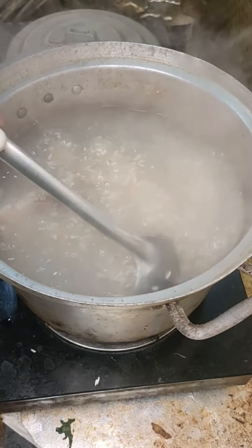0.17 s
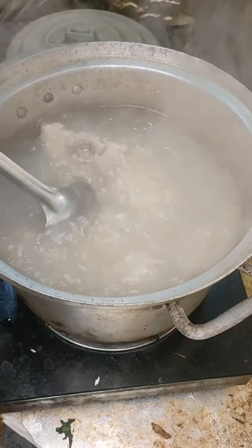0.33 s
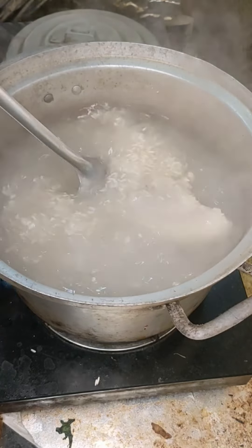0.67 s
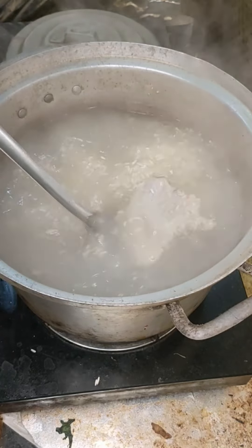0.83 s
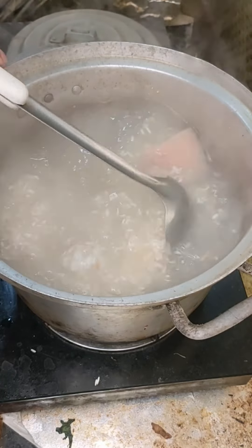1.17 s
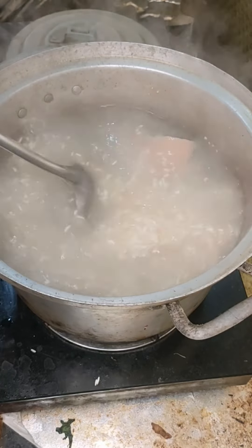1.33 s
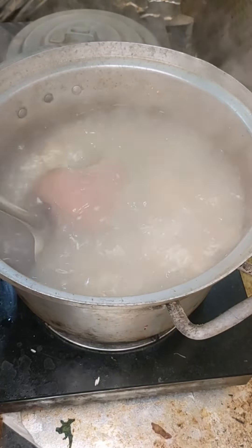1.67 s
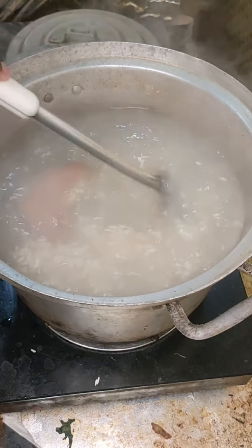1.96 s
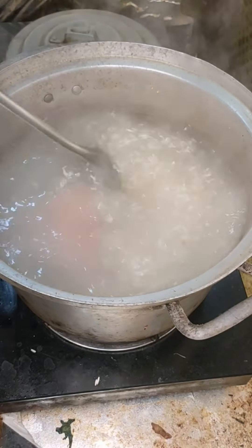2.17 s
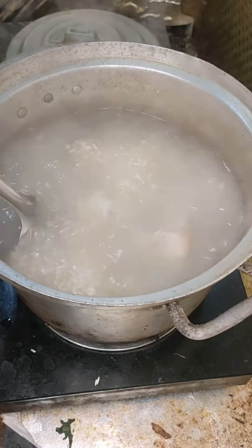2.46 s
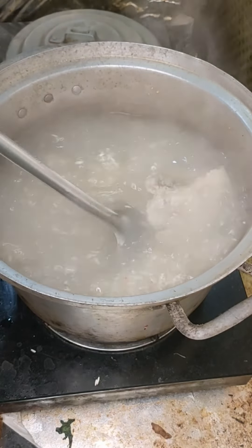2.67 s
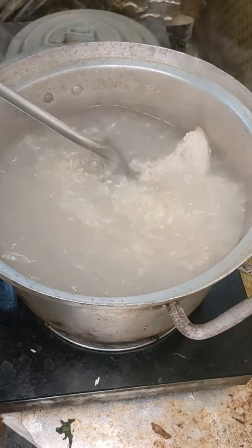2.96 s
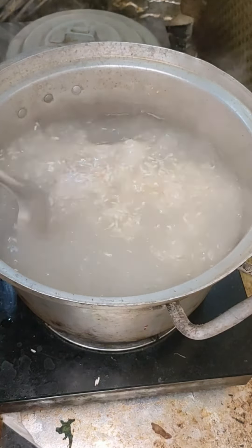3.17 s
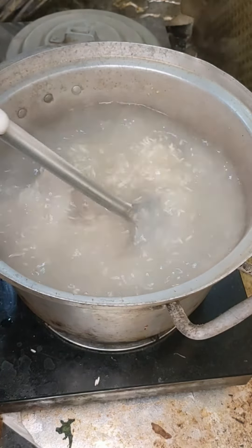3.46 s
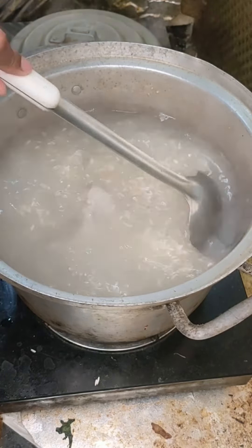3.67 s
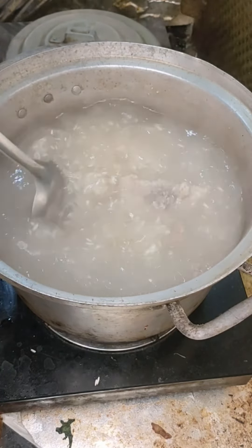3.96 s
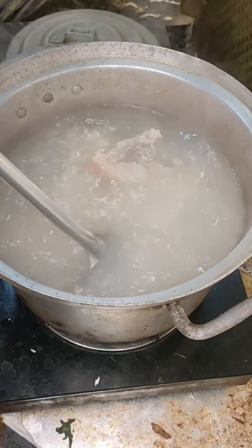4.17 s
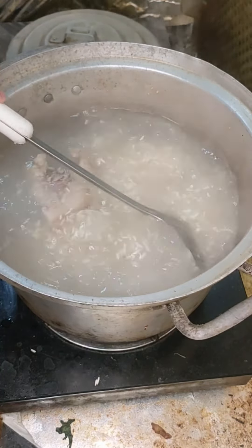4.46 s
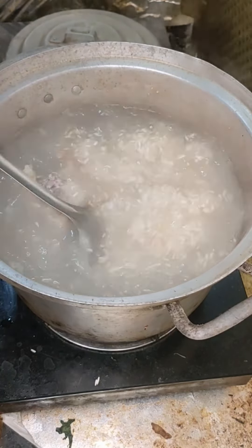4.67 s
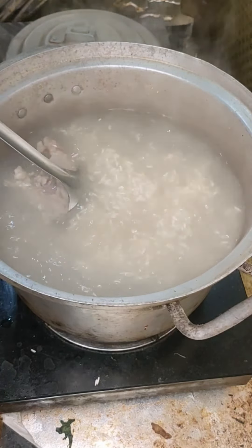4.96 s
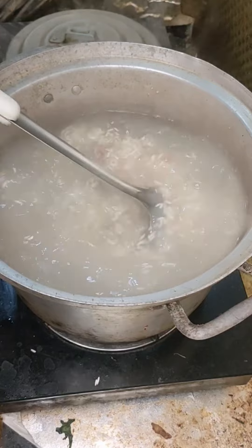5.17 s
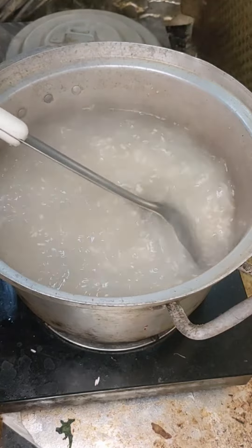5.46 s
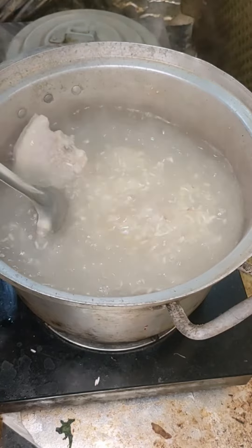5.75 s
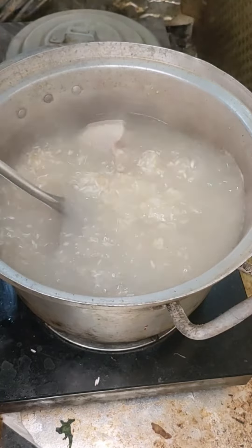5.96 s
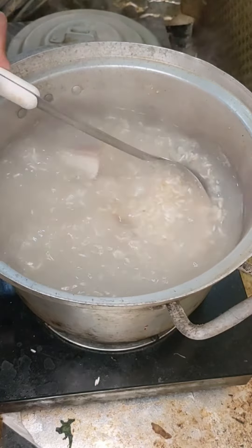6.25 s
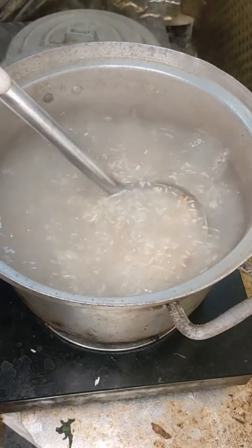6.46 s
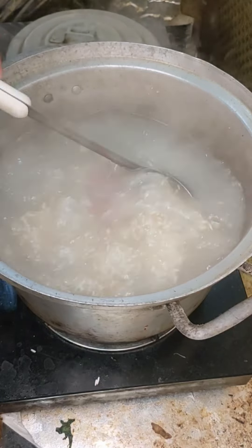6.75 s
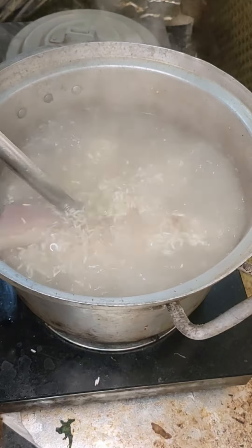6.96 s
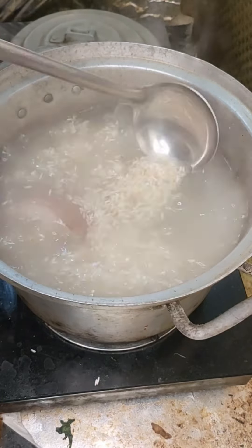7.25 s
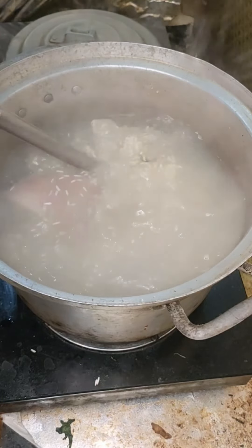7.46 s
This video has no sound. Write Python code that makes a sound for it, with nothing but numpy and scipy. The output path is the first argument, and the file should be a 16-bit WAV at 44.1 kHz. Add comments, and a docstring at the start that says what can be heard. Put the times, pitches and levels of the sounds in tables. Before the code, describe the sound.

A metal ladle scrapes and clacks in a big pot of simmering porridge over a roaring gas flame, while a cleaver chops on wood further off.

```python
"""A steel ladle stirs rice porridge in a big aluminium pot on a gas burner, close to the microphone.
It rasps over the bottom (shaped noise and grit), swishes, clacks on the porridge-damped wall (bursts of tiny
impacts through resonances) and makes the porridge gulp (sinking sines) over a simmer and a flame's roar.
Further off in the hard-walled kitchen a cleaver chops on a wooden board: bursts and thuds through room echoes."""
import sys
import numpy as np
from scipy import signal
from scipy.fft import rfft, irfft
from scipy.io import wavfile
from scipy.ndimage import uniform_filter1d

SR = 44100
rng = np.random.default_rng(int(sys.argv[2]) if len(sys.argv) > 2 else 0)


def digitize_waveform(pressure):
    """Quantize a signal to 16-bit integers and store it at the path in sys.argv[1].

    Rows of a 2-D input are taken as channels; values are limited to [-1, 1].
    """
    field = np.atleast_2d(pressure).T
    bounded = np.clip(field, -1, 1)
    quanta = np.round(bounded * 32767).astype(np.int16)
    wavfile.write(sys.argv[1], SR, quanta)


N = 335160  # samples
TIME = np.arange(N) / SR  # s
HZ = np.fft.rfftfreq(4096, 1 / SR)
# All level_db columns are relative: each source adds its own gain.


def amp(db):
    """Decibels to gain."""
    return 10 ** (np.asarray(db) / 20)


def evened(x):
    """Scales to rms 1."""
    return x / np.sqrt(np.mean(x ** 2) + 1e-20)


def unit(x):
    """Scales each channel to energy 1."""
    return x / np.sqrt(np.sum(x ** 2, -1, keepdims=True) + 1e-20)


def read(points, hz=HZ):
    """A spectrum table, joined by lines on a log-frequency axis."""
    f, value = np.transpose(points)
    return np.interp(np.log(hz + 1), np.log(f), value)


def add(mix, start_s, sound):
    """Mixes a stereo sound in at a time."""
    part = mix[:, round(start_s * SR):][:, :sound.shape[-1]]
    part += sound[..., :part.shape[-1]]


def convolve(x, response):
    """Convolution, channel by channel."""
    return signal.fftconvolve(np.atleast_2d(x), np.atleast_2d(response), axes=1)


def bump(hz, centre_hz, width):
    """A resonance peak of height 1; width is a share of its frequency."""
    return 1 / (1 + ((hz / centre_hz - 1) / width) ** 2)


def causal(db):
    """The fastest-starting (minimum-phase) impulse response with this spectrum."""
    log_gain = np.log(amp(np.r_[db, db[-2:0:-1]]))
    return np.fft.ifft(np.exp(np.conj(signal.hilbert(log_gain)))).real[:len(db)]


# Left-right likeness of diffuse sound, high in the bass: pitch_hz, likeness (0 to 1)
DIFFUSE_LIKENESS = [(60, 0.82), (200, 0.94), (330, 0.95), (550, 0.78), (1000, 0.009), (14000, 0.014)]


def noise(field_db, count=N, size=512):
    """Diffuse stereo noise, alike in the bass, shaped by a dB field over (time, Hz)."""
    hop = size // 4
    t = np.arange(count // hop + 6)[:, None] * hop / SR
    hz = np.fft.rfftfreq(size, 1 / SR)
    a, b, c, d = rng.standard_normal((4, len(t), len(hz)))
    same = read(DIFFUSE_LIKENESS, hz)
    left = a + 1j * b
    right = same * left + np.sqrt(1 - same ** 2) * (c + 1j * d)
    z = np.array([left, right]) * amp(field_db(t, hz))
    return signal.istft(z, nperseg=size, noverlap=size - hop, time_axis=1, freq_axis=2)[1][:, :count]


def patches(t, hz, count, size):
    """Random blotches, count frames long and size bins wide, of rms 1."""
    blotches = uniform_filter1d(rng.standard_normal((len(t), len(hz))), count, axis=0)
    return evened(uniform_filter1d(blotches, size, axis=1))


def smoothed(x, width_hz):
    """Evens out a diffuse sound's broad peaks and dips and keeps its fine grain."""
    z = rfft(x)
    power = uniform_filter1d((abs(z) ** 2).mean(0), int(width_hz * x.shape[1] / SR))
    return unit(irfft(z / np.sqrt(abs(power) + 1e-20), x.shape[1]))


def chatter(length_s, count=4096):
    """A burst of tiny impacts with a flattened spectrum, dying over about length_s."""
    t = TIME[:count]
    burst = noise(lambda when, hz: 0, count=count, size=256) * np.exp(-(t / length_s) ** 2)
    z = rfft(burst)
    flat = irfft(z / np.sqrt(abs(z) + 1e-9))
    return unit(flat * np.exp(-(t / (2 * length_s)) ** 4))


# How long the hard-walled kitchen rings in each band: pitch_hz, t60_s
KITCHEN_DECAY = [(100, 0.45), (400, 0.58), (1000, 0.54), (2800, 0.41), (7000, 0.29), (14000, 0.21)]


def kitchen(build_s):
    """The room's tail: it builds up, then each band dies at its own speed."""
    tail = noise(lambda t, hz: 2.22 * patches(t, hz, count=10, size=3) - 60 * t / read(KITCHEN_DECAY, hz),
                 count=SR * 3 // 4, size=256)
    return unit(tail * (1 - np.exp(-TIME[:tail.shape[1]] / build_s)))


# Colour of the gas flame under the pot: pitch_hz, level_db
FLAME_COLOUR = [(20, -6), (45, -5), (90, -9), (180, 1), (300, -1.5), (480, -1), (800, -11), (1800, -12),
                (3000, -16), (4200, -19), (7000, -23), (14000, -73)]


def burner():
    """The steady roar of the flame under the pot: shaped noise with a faint flicker in each band."""
    roar = noise(lambda t, hz: read(FLAME_COLOUR, hz) + 0.5 * patches(t, hz, count=8, size=5), size=2048)
    return amp(-47.0) * evened(roar)


def pop(turns, cycles, side):
    """One bubble rings for a few cycles, somewhere between left and right."""
    ring = np.sin(2 * np.pi * turns) * (1 - np.exp(-turns)) * np.exp(-turns / cycles)
    return ring * np.sqrt([[.5 + side], [1.5 - side]])


BUBBLES_PER_S, BUBBLE_CYCLES = 22, 4.1
BUBBLE_DB, BUBBLE_SPREAD_DB = -47, 5
BUBBLE_LOW_HZ, BUBBLE_HIGH_HZ = 326, 1900


def bubbles():
    """Small bubbles burst at random across the simmering surface, each a few cycles long."""
    out, t = np.zeros((2, N)), TIME[:SR // 12]
    for when, size, loud, side in rng.random((int(BUBBLES_PER_S * N / SR), 4)):
        # the larger the bubble, the lower it rings
        pitch_hz = BUBBLE_HIGH_HZ * (BUBBLE_LOW_HZ / BUBBLE_HIGH_HZ) ** size
        level_db = BUBBLE_DB + BUBBLE_SPREAD_DB * min(-np.log(1 - loud), 2)
        add(out, when * N / SR, amp(level_db) * pop(t * pitch_hz, BUBBLE_CYCLES, side))
    return out


# Modes of the wooden board: multiple (of the thud's pitch), level_db, t60_s
BOARD_MODES = [(.6, -12.5, 0.022), (1, 3, 0.07), (1.78, -3, .06)]
CRUNCH_DIRECT_DB, THUD_DIRECT_DB = -14, -12.5  # what comes straight to the microphone, against the room
THUD_LOW_HZ = 55  # the thud carries little below this


def blow(level_db, length_s, thud_db, thud_hz, crack):
    """The blade crunches through and thuds into the board; nearly all of it arrives by way of the walls."""
    out, t, age = np.zeros((2, SR)), TIME[:len(HZ)], TIME[:SR * 3 // 4]
    direct = age == 0  # a single click at the start
    near_walls = noise(lambda when, hz: -60 * when / 0.16, count=len(age), size=256)
    room = kitchen(build_s=0.0065) + amp(-1.5) * unit(near_walls)
    room *= amp(1.34 * evened(uniform_filter1d(rng.standard_normal(len(age)), 90)))  # echoes come in clumps
    room = smoothed(room, width_hz=72)

    cut = chatter(length_s, count=12288)[0]
    cut = cut * (1 - np.exp(-TIME[:len(cut)] / (0.065 * length_s)))  # the force grows as the edge bites
    crunch = convolve(cut, room + amp(CRUNCH_DIRECT_DB) * direct)[:, :len(age)]
    crunch = unit(convolve(crack, smoothed(crunch, width_hz=100)))
    add(out, 0, amp(level_db + 33.5) * crunch * amp([[-.3], [.3]]))

    board = np.zeros(len(t))
    for multiple, mode_db, t60_s in BOARD_MODES:
        board += amp(mode_db - 60 * t / t60_s) * np.sin(2 * np.pi * multiple * thud_hz * t)
    highpass = signal.butter(2, THUD_LOW_HZ, "highpass", fs=SR, output="sos")
    board = signal.sosfilt(highpass, board)
    thud = unit(convolve(board, room + amp(THUD_DIRECT_DB) * direct))
    add(out, 0.44 * length_s, amp(level_db + thud_db + 22) * thud)

    # a few splinters snap after the blow and come straight over, about 260 per second before they thin out
    snaps = np.sign(rng.standard_normal(room.shape)) * (rng.random(len(age)) < 260 / SR)
    snaps = snaps * np.sqrt(age) * np.exp(-age / 0.04)
    add(out, 0, amp(level_db + 23.5) * unit(convolve(snaps, crack)))
    return out


# Cleaver blows on the board: start_s, level_db, cut_s (time to cut through), thud_db, thud_hz,
# hollow_hz and hollow_db (the board's hollow tone), ring_hz, ring_db and ring_width (the blade's ring;
# width as a share of its frequency), edge_db (sharp treble)
CLEAVER_CHOPS = [(3.620, -16.5, 0.019, -5, 230, 480, 8.5, 1080, 5, .13, 11.5),
                 (3.7376, -19.5, 0.0034, -5.5, 234, 486, 6, 4400, 6.5, 0.43, 12.5),
                 (3.885, -26, 0.0012, -2, 222, 480, 6, 3870, 9.5, 0.048, 5.5),
                 (4.431, -17, 0.0062, -8.5, 230, 510, 4, 2900, 2.5, .2, 1),
                 (5.154, -19.5, 0.021, -2.5, 183, 580, 5, 1139, 1.5, .12, 6),
                 (5.783, -18, 0.0091, 2, 215, 363, 2.5, 1070, 5.5, .12, 1),
                 (6.208, -19.5, 0.0254, -7, 208, 371, 3, 1160, 3, 0.1, 4.5),
                 (6.756, -16.5, 0.0227, -6, 201, 450, 3, 4360, 2.5, 0.17, 13.5),
                 (7.396, -24, 0.019, -3.5, 201, 463, 7.5, 1210, 3, .12, 5)]
# The edge bites in ahead of a blow, or is pushed on through gristle after it:
# start_s, level_db, length_s, thud_db
EDGE_CRUNCHES = [(4.417, -33.5, 0.018, 1), (4.528, -28, 0.025, 7), (4.598, -36.5, 0.046, -1),
                 (4.671, -39.5, 0.038, 1), (5.225, -34.5, 0.011, 3), (5.276, -33, 0.013, -15),
                 (5.753, -29.5, 0.0194, 9), (5.875, -29.5, 0.012, -20), (6.864, -35, 0.011, 3.5),
                 (7.356, -33, 0.015, 6)]
# Common colour of cutting sounds: pitch_hz, level_db
CRACK_COLOUR = [(30, -25.5), (100, -6), (300, 1), (520, 3), (720, -0.5), (1130, 5.5), (1700, 3),
                (2800, 3.5), (4200, 1), (5500, -8), (7000, -11.5), (14000, -15)]


def cleaver():
    """Each chop is one blow, coloured by where it lands on the board; crunches share the nearest chop's colour."""
    out, cracks = np.zeros((2, N)), []
    treble = HZ ** 4 / (HZ ** 4 + 6000 ** 4)
    for (start_s, level_db, cut_s, thud_db, thud_hz, hollow_hz, hollow_db,
         ring_hz, ring_db, ring_width, edge_db) in CLEAVER_CHOPS:
        hollow = hollow_db * bump(HZ, hollow_hz, width=0.19)
        blade = ring_db * bump(HZ, ring_hz, ring_width)
        crack = unit(causal(read(CRACK_COLOUR) + hollow + blade + edge_db * treble))
        cracks.append((start_s, thud_hz, crack))
        add(out, start_s, blow(level_db, cut_s, thud_db, thud_hz, crack))
    for start_s, level_db, length_s, thud_db in EDGE_CRUNCHES:
        _, thud_hz, crack = min(cracks, key=lambda chop: abs(chop[0] - start_s))
        add(out, start_s, blow(level_db, length_s, thud_db, thud_hz, crack))
    return out


# Splinters of bone snapping: start_s, level_db, ring_hz
BONE_SNAPS = [(3.637, -16, 1470), (5.8836, -23, 1400), (5.9085, -25, 2400), (5.9324, -27, 1600),
              (6.9327, -29, 2520)]
SNAP_S, SNAP_RING_DB, SNAP_ROOM_DB = 0.0019, 10, -19


def splinters():
    """Bone gives way in single sharp snaps: brief chatter through one ring, with a little room behind."""
    out = np.zeros((2, N))
    for start_s, level_db, ring_hz in BONE_SNAPS:
        colour = causal(read(CRACK_COLOUR) + SNAP_RING_DB * bump(HZ, ring_hz, width=0.17))
        add(out, start_s, amp(level_db + 21.0) * unit(convolve(chatter(SNAP_S), colour)))
    return out + amp(SNAP_ROOM_DB) * convolve(out, kitchen(build_s=0.0036))[:, :N]


# Porridge folding over the bowl in a loose cluster of bubbles: start_s, level_db, middle_hz, length_s
PORRIDGE_FOLDS = [(0.229, -46.5, 457, 0.073), (2.304, -36, 410, 0.013), (2.329, -43.5, 440, 0.036),
                  (2.984, -40.5, 285, .015), (5.513, -40, 524, .04)]
GURGLE_POPS_PER_S, GURGLE_CYCLES = 360, 2.9
GURGLE_SPREAD_OCT = 0.54  # to either side of the middle pitch


def gurgles():
    """A fold of porridge traps a handful of bubbles of mixed size, which pop one after another."""
    out, t = np.zeros((2, N)), TIME[:SR // 12]
    for start_s, level_db, middle_hz, length_s in PORRIDGE_FOLDS:
        cluster = np.zeros((2, SR // 4))
        pops = int(GURGLE_POPS_PER_S * length_s)
        for k, (late, size, side) in enumerate(rng.random((pops, 3))):
            pitch_hz = middle_hz * 2 ** (GURGLE_SPREAD_OCT * (2 * size - 1))
            add(cluster, length_s * (k + late) / pops, pop(t * pitch_hz, GURGLE_CYCLES, side))
        add(out, start_s, amp(level_db) * np.sqrt(length_s * SR) * unit(cluster))
    return out


# Air pockets closing behind the ladle: start_s, level_db, pitch_hz (before it sags), length_s
AIR_POCKETS = [(0.67, -37.5, 126, 0.052), (1.748, -27, 189, 0.006), (2.454, -39, 343, 0.02),
               (3.1, -22, 153, 0.01), (3.339, -26.5, 134, 0.029), (4.133, -31, 137, 0.011),
               (5.062, -29.5, 137, 0.036), (5.063, -29.5, 508, 0.022), (5.548, -27.5, 125, 0.01),
               (5.567, -27.5, 112, 0.014), (7.448, -26.5, 144, 0.027)]
# the pocket's pitch sinks and wobbles as its thick walls give way
GULP_SAG_OCT_PER_S, GULP_WOBBLE_OCT, GULP_RISE_S = 4.1, 0.14, 0.001


def gulps():
    """Big air pockets ring low and briefly in the thick porridge, sinking in pitch as they die."""
    out, t = np.zeros((2, N)), TIME[:SR // 6]
    for start_s, level_db, pitch_hz, length_s in AIR_POCKETS:
        wobble = GULP_WOBBLE_OCT * evened(uniform_filter1d(rng.standard_normal(len(t)), size=130))
        turns = np.cumsum(pitch_hz * 2 ** (wobble - GULP_SAG_OCT_PER_S * t)) / SR
        swell = (1 - np.exp(-t / GULP_RISE_S)) * np.exp(-(t / length_s) ** 2)
        # the same wobble also sways the loudness
        add(out, start_s, amp(level_db) * np.sin(2 * np.pi * turns) * (1 + wobble) * swell)
    return out


# Wet swishes as the bowl sweeps through the rice: start_s, level_db, centre_hz, swell_s (time to the peak)
BOWL_SWEEPS = [(.255, -39, 3100, 0.033), (.42, -39.5, 4270, 0.013), (0.682, -43, 4300, 0.019),
               (0.713, -39, 1450, 0.011), (.89, -44.5, 3150, 0.031), (1.092, -40.5, 3460, 0.02),
               (1.187, -42, 3750, 0.021), (2.057, -45, 5700, 0.031), (2.333, -46, 4030, 0.044),
               (2.6, -41.5, 2950, 0.019), (2.896, -43.5, 4000, 0.03), (3.182, -36, 4050, 0.016),
               (4.23, -45, 1750, 0.042), (4.869, -47.5, 2600, 0.015), (5.516, -40, 1160, 0.02),
               (5.57, -37.5, 2380, 0.022)]
SWISH_GRAIN_DB = 2.6  # single grains stand out of a swish


def swishes():
    """Wet grains rush over the steel: a fizz that swells fast and ebbs."""
    out = np.zeros((2, N))
    for start_s, level_db, centre_hz, swell_s in BOWL_SWEEPS:
        age = TIME[:SR // 3] / swell_s
        fizz = noise(lambda t, hz: 19 * (bump(hz, centre_hz, width=0.48) - 1)
                     + 3.6 * patches(t, hz, count=3, size=3), count=len(age), size=256)
        grains = amp(SWISH_GRAIN_DB * evened(uniform_filter1d(rng.standard_normal(len(age)), size=60)))
        add(out, start_s, amp(level_db) * evened(fizz * grains) * age * np.exp(1 - age))
    return out * amp([[2.1], [.9]])  # left, right


def contact(length_s, metal_spectrum_db, metal_db, knock_spectrum_db, knock_db):
    """One touch of ladle and pot, eased in by the porridge: chatter sounds the metal and knocks the filled pot."""
    touch = chatter(length_s)
    touch = touch * (1 - np.exp(-TIME[:touch.shape[1]] / 0.00046))
    metal = unit(convolve(touch, causal(metal_spectrum_db)))
    knock = unit(convolve(chatter(length_s), causal(knock_spectrum_db)))
    return amp(metal_db + 25.0) * metal * amp([[.7], [-.7]]) + amp(knock_db + 18.0) * knock


# The ladle's edge on the bare wall: start_s, level_db, chatter_s, upper_hz, upper_db, lower_hz, lower_db
# (its two rings), knock_db (dull knock of the whole pot)
WALL_CLACKS = [(0.2025, -20.5, 0.0029, 2860, 4.5, 1350, 2, -25.5),
               (0.579, -28, 0.012, 4860, 4, 2640, -2, -46), (0.687, -30, 0.013, 3020, -16, 1580, 5, -43),
               (1.2022, -31.5, .003, 3650, 29, 1900, -2, -53),
               (1.6111, -21, 0.0031, 6030, 2, 3200, -2, -26.5),
               (1.621, -27, 0.0063, 4000, -2, 2090, 10, -27), (1.637, -31, 0.0094, 3000, 5, 1580, 4, -31),
               (1.688, -15, 0.0026, 3100, 11, 1710, 12.5, -43),
               (2.1452, -35.5, 0.006, 1780, 17, 1010, 21, -37),
               (2.216, -36.5, 0.0021, 5440, -2, 2900, -11, -56),
               (2.4456, -26, 0.011, 2680, 5.5, 1320, 8.5, -27.5),
               (3.0981, -21, 0.0051, 3900, 2.5, 2300, 8.5, -24.5),
               (3.1508, -35, 0.0044, 4000, -3, 2100, 1, -30),
               (3.258, -33.5, 0.0024, 2380, 12, 1240, 5, -48),
               (3.3092, -31.5, 0.0011, 5000, -5, 2600, 2, -38),
               (3.405, -36.5, 0.0044, 1630, 32, 875, 29, -32),
               (3.451, -33, 0.002, 3460, 11, 1860, 24, -29.5)]
# Dull knocks, cushioned by meat and porridge: start_s, level_db, chatter_s
DULL_KNOCKS = [(.675, -29, 0.0075), (1.749, -30, 0.0016), (2.144, -34, 0.015), (2.307, -37, 0.007),
               (2.333, -28, 0.018), (3.032, -26.5, 0.039), (3.121, -31.5, 0.0036), (3.288, -24, 0.017),
               (4.1321, -21.5, 0.0099), (5.0604, -19, 0.0056), (5.571, -28, 0.026), (7.448, -19.5, 0.0056)]
# Colour of the bare metal: pitch_hz, level_db
METAL_COLOUR = [(100, -46), (500, -3), (950, -0.5), (1450, 0.5), (1850, 4.5), (2400, 8), (3200, 5),
                (4000, 8), (4700, 4), (5400, 5.5), (6800, 2.5), (14000, -4)]
# Colour of the filled pot when knocked: pitch_hz, level_db
POT_COLOUR = [(40, -25), (120, -2.5), (220, -1.5), (450, -3.5), (800, -9), (2000, -11.5), (8000, -53)]
RING_WIDTH, WALL_RING_WIDTH = 0.11, 0.22  # share of frequency: at the touch, and once spread round the wall
POT_HZ, POT_DB = 500, 2  # the filled pot's resonance
KNOCK_METAL_DB = -12  # holds back the metal in a dull knock


def clacks():
    """The ladle chatters on the wall for milliseconds; porridge kills the ring, a broad rattle lingers in the pot."""
    out, wall = np.zeros((2, 2, N))
    for start_s, level_db, chatter_s, upper_hz, upper_db, lower_hz, lower_db, knock_db in WALL_CLACKS:
        for mix, width in (out, RING_WIDTH), (wall, WALL_RING_WIDTH):
            rings = upper_db * bump(HZ, upper_hz, width) + lower_db * bump(HZ, lower_hz, width)
            metal = read(METAL_COLOUR) + rings
            add(mix, start_s, contact(chatter_s, metal, level_db, read(POT_COLOUR), knock_db))
    filled_pot = read(POT_COLOUR) + POT_DB * bump(HZ, POT_HZ, width=0.11)
    for start_s, level_db, chatter_s in DULL_KNOCKS:
        for mix in out, wall:
            add(mix, start_s, contact(chatter_s, read(METAL_COLOUR), level_db + KNOCK_METAL_DB,
                                      filled_pot, level_db))
    rattle = noise(lambda t, hz: 0, count=4096) * amp(-60 * TIME[:4096] / 0.1)
    inside_pot = amp(-8.0) * convolve(wall, smoothed(rattle, width_hz=150))[:, :N]
    in_kitchen = amp(-10.5) * convolve(wall, kitchen(build_s=0.00097))[:, :N]
    return out + inside_pot + in_kitchen


# How hard the ladle bears on the bottom: start_s, level_db
LADLE_EFFORT = [(0, -43), (.55, -44), (.75, -41), (1.25, -43), (1.57, -46), (1.95, -42.5), (2.22, -47),
                (2.41, -46), (2.72, -43), (2.87, -48.5), (3.22, -44.5), (3.35, -41.5), (3.6, -39.5),
                (4.0, -45.5), (5.0, -51.5), (5.48, -48.5), (5.65, -43), (6.05, -53), (7.6, -49.5)]
# Ring of the ladle bowl, sinking as the stirring goes on: start_s, pitch_hz
BOWL_RING = [(0, 4160), (1.6, 3420), (2.3, 1950), (4, 1810)]
# Colour of the edge on the bottom: pitch_hz, level_db
RASP_COLOUR = [(200, -14), (600, 1.5), (1100, 3.5), (1800, 4.5), (3000, 0), (4200, 2.5), (5500, -1),
               (7000, -3), (14000, 2.5)]
# Colour of the moving porridge: pitch_hz, level_db
SLOSH_COLOUR = [(60, -41), (170, 14), (300, 5), (480, 8.5), (700, -2), (1200, -10.5), (4000, -86)]
SURGE_DB, SURGE_S = 0.5, 0.035  # the rasp comes unevenly as lumps pass under the edge
SLOSH_FOLLOWS, SLOSH_DB = 0.39, -36  # the porridge follows the effort only in part
GRIT_DB, GRIT_TOP_HZ = -8.5, 5000  # single rice grains under the edge, dulled by the porridge


def stirring():
    """The ladle's edge grinds over rice and metal, its ring shifting as it turns; the porridge sloshes along."""
    effort_db = np.interp(TIME, *np.transpose(LADLE_EFFORT))
    knots = np.arange(0, 8, SURGE_S)
    surge_db = SURGE_DB * np.interp(TIME, knots, rng.standard_normal(len(knots)))

    rasp = noise(lambda t, hz: read(RASP_COLOUR, hz)
                 + 6.5 * bump(hz, np.interp(t, *np.transpose(BOWL_RING)), width=0.17)
                 + 2.6 * patches(t, hz, count=16, size=7))
    # clicks of either sign and uneven strength, about 500 per second in each channel
    grit = np.sign(rng.standard_normal((2, N))) * (rng.random(N) < 500 / SR)
    grit = grit * amp(7.0 * np.minimum(rng.exponential(1, N), 2))
    grit_colour = causal(read(RASP_COLOUR) - 20 * np.log10(1 + (HZ / GRIT_TOP_HZ) ** 2))
    grit = convolve(grit, grit_colour)[:, :N]
    scrape = evened(rasp) + amp(GRIT_DB) * evened(grit)
    scrape = scrape * amp(effort_db + surge_db + [[2.5], [1.3]])  # left, right

    slosh = noise(lambda t, hz: read(SLOSH_COLOUR, hz) + 1.6 * patches(t, hz, count=5, size=3), size=1024)
    return scrape + evened(slosh) * amp(SLOSH_FOLLOWS * effort_db + SLOSH_DB)


def scene():
    """Stove and pot close by, the chopping further off."""
    background = burner() + bubbles() + cleaver() + splinters()
    porridge = gurgles() + gulps()
    return background + porridge + swishes() + clacks() + stirring()


# Response of the microphone: pitch_hz, level_db
MIC_RESPONSE = [(5000, 0.5), (6200, -3), (6700, -11.5), (7300, -25), (8100, -30.5), (9000, -22.5),
                (13500, -24), (15500, -42)]
# Unlikeness of its two ports, scaled down in use: pitch_hz, level_db (positive favours the left)
PORT_LEAN = [(60, 1.5), (130, -1), (290, 2), (640, -5), (1410, -1), (3100, 0), (6820, 3.5), (15000, 5.5)]
EDGE_HZ = 15800  # upper band limit


def record(dry):
    """The microphone falls off steeply in the treble, its two ports a little unlike; then the band limit."""
    lean_db = 0.35 * read(PORT_LEAN)
    ports = [causal(read(MIC_RESPONSE) + lean_db), causal(read(MIC_RESPONSE) - lean_db)]
    dull = convolve(dry, ports)[:, :N]
    lowpass = signal.firwin(511, EDGE_HZ, window=("kaiser", 9), fs=SR)
    return signal.oaconvolve(dull, lowpass[None], "same")


dry = scene()
out = record(dry)
digitize_waveform(out)
```